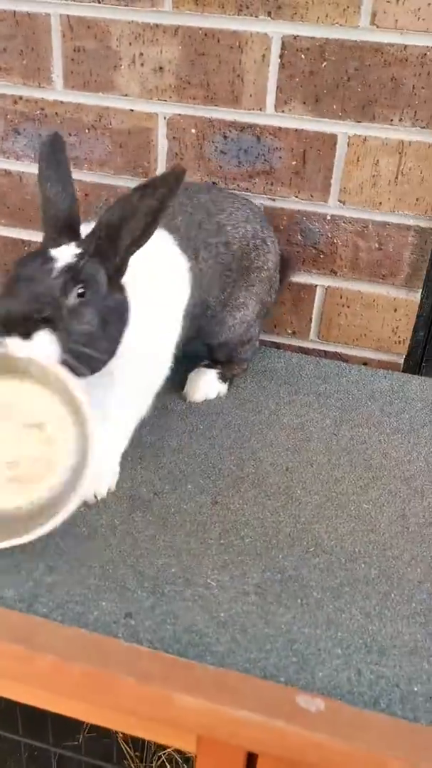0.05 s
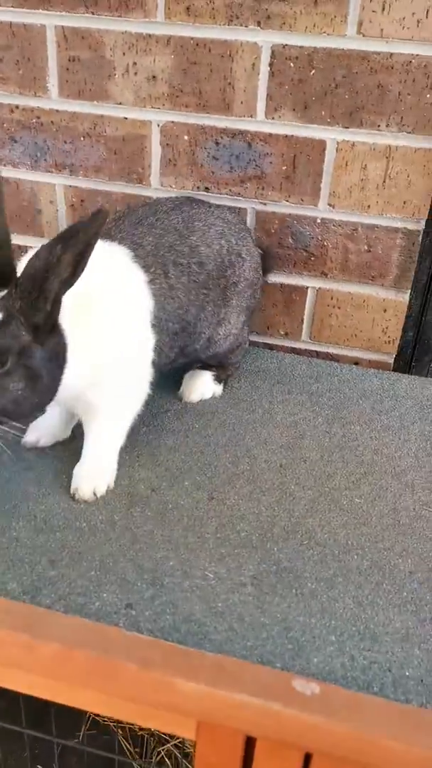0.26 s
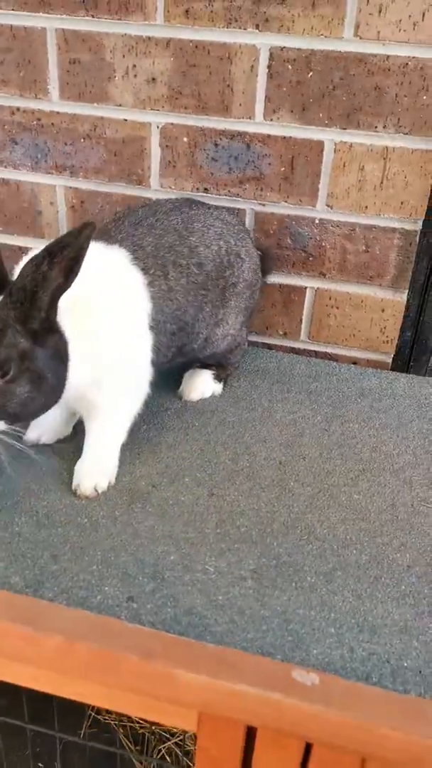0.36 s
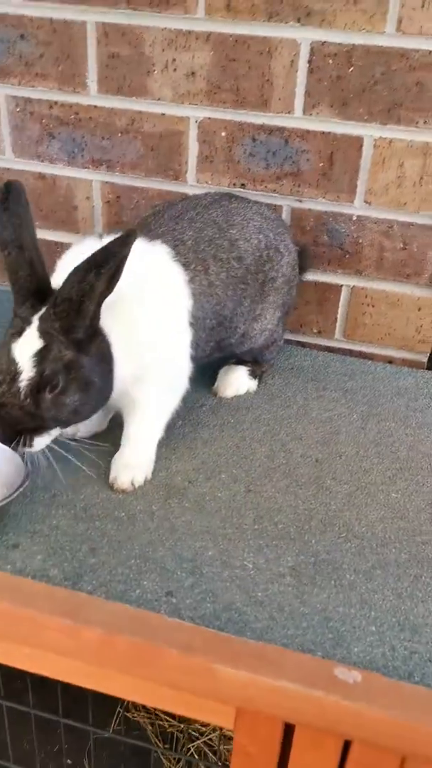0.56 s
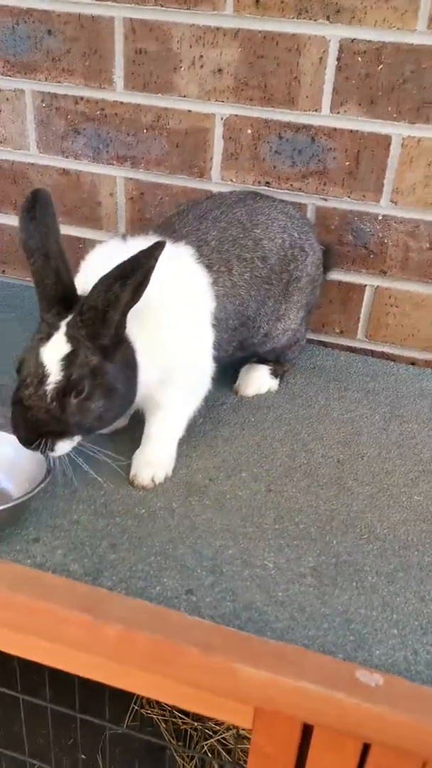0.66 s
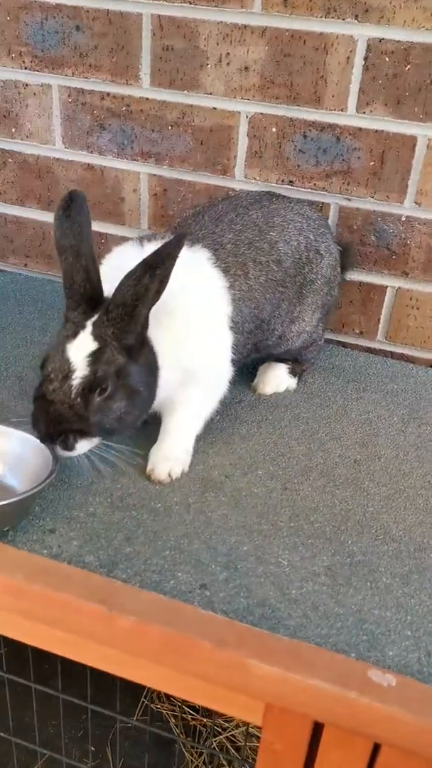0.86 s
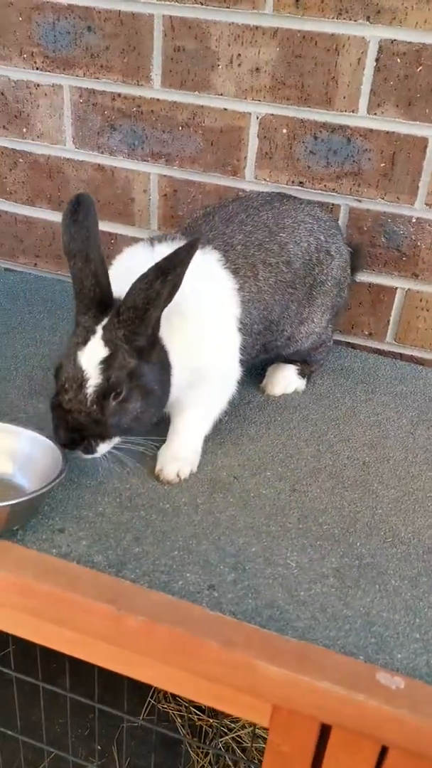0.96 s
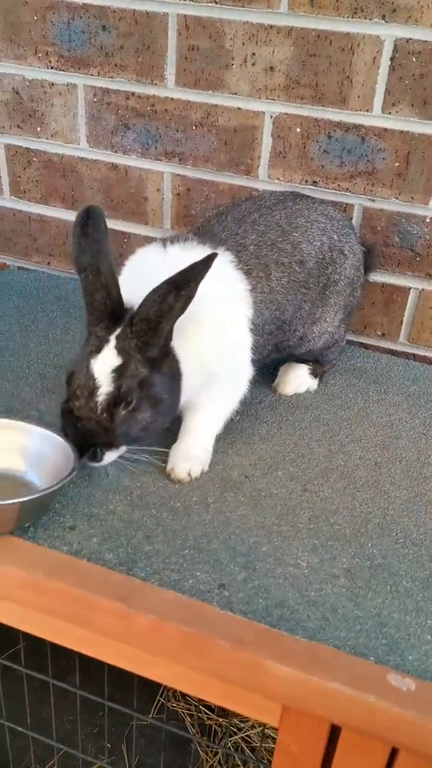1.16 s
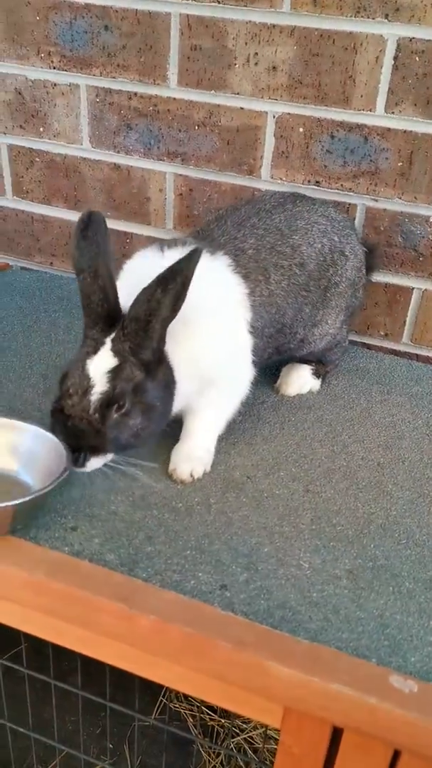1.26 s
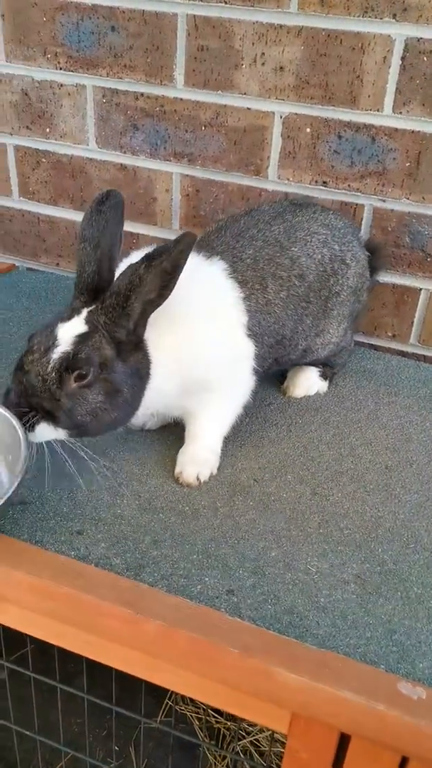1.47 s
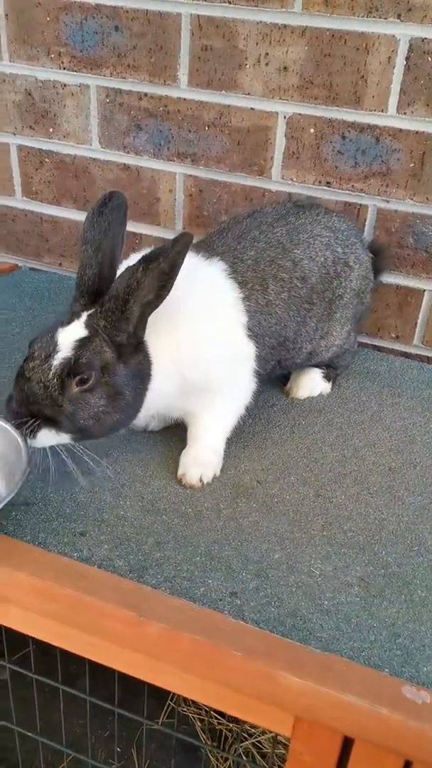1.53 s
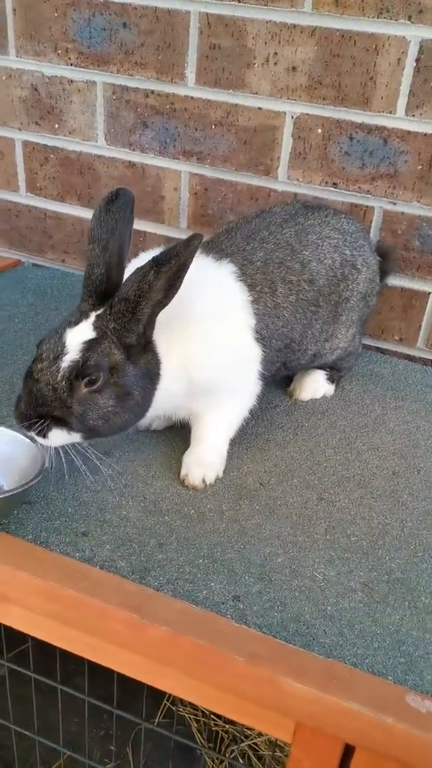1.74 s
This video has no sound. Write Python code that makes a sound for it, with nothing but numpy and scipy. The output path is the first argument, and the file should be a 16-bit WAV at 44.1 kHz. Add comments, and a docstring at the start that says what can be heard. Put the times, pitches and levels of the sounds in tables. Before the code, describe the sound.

A steel bowl lands with a bong, clangs, rolls and settles, then is nudged again.

```python
"""A faint scrape and soft thumps come first, then a loud bong: a rabbit has tossed its steel feeding
bowl onto the felted wooden top of its hutch, outdoors. The base flexes as it lands; the bowl tips onto
its rim with a clang, rolls and settles. Each contact excites the damped modes of the bowl's wall, and
the dragging rim makes single modes sing. Paws thump the lid and the felt is lightly scratched;
then the rabbit noses the bowl along and knocks it once more."""
import sys
import numpy as np
from scipy import signal
from scipy.fft import rfft, irfft
from scipy.io import wavfile
from scipy.ndimage import uniform_filter1d

SR = 44100
rng = np.random.default_rng(int(sys.argv[2]) if len(sys.argv) > 2 else 0)


def inscribe(sig):
    """Save sig as 16-bit PCM at rate SR to the path in sys.argv[1].

    A 1-D sig is mono; a 2-D sig holds one channel per row.
    Samples are clipped to [-1, 1] before scaling.
    """
    pcm = np.round(np.clip(np.atleast_2d(sig).T, -1, 1) * 32767)
    wavfile.write(sys.argv[1], SR, pcm.astype(np.int16))


N = 79380
HZ = np.fft.rfftfreq(4096, 1 / SR)
EDGE_HZ = 15100

# Coherence of the sound field. Each row: frequency in Hz, correlation of left and right.
COHERENCE = [(30, 0.92), (150, 0.97), (700, .98), (1400, 0.98), (2600, 0.66), (4500, 0.22), (8000, 0.097),
             (14000, -0.25)]
# Spectrum of the outdoor background. Each row: frequency in Hz, relative spectral density in dB.
AIR_SPECTRUM = [(25, -10), (90, -9.5), (160, -10), (260, -11), (600, -15.5), (950, -10), (1310, -19.5),
                (1950, -27), (2700, -28), (3700, -37), (5000, -41), (6300, -39), (7800, -41), (9500, -57),
                (15000, -69)]

# Dull response of bowl and lid together. Each row: frequency in Hz, gain in dB.
CLATTER_SPECTRUM = [(30, -17), (80, -15), (150, -4.5), (205, -12), (265, 3), (330, -3.5), (500, 2),
                    (680, -1.5), (950, 0), (1300, -5.5), (1600, -12.5), (2100, -16), (2550, -11),
                    (3200, -23.5), (4300, -24.5), (6000, -24), (7500, -17), (8100, -37.5), (8900, -34.5),
                    (9600, -53.5), (12500, -44.5), (15000, -52.5)]
# Direction of the clatter. Each row: frequency in Hz, left over right in dB.
CLATTER_BALANCE = [(100, -1), (600, -1), (1400, 2), (2600, 4.5), (5000, -2.5), (8000, 0), (13000, 5)]
# Bands that express contact hardness. The entries, in Hz: unchanged low band, bite, treble, fizz.
HARDNESS_HZ = [800, 2400, 6500, 12500]
# Rolling and sliding. Each row: start and length in seconds; change over the stroke, clatter level,
# bite, treble, fizz and ring gain at 1 kHz, all in dB; ring tilt in dB per octave.
SLIDES = [(0, 0.054, -9.5, -34, -7, 7, 10, -21, -0.5), (.352, 0.13, -2.5, -19, 3.5, 1, -2, 2, -2),
          (0.496, 0.065, -4.5, -18, 3.5, -4, 2, -19.5, 2),
          (0.573, 0.15, -10.5, -32.5, 3.5, 6, -10, -22.5, -8),
          (0.725, 0.058, -1.5, -30, -0.5, 7.5, 11, -16.5, -2.5),
          (0.803, 0.064, -10, -48.5, -1, 21, 0.5, -47, -5.5),
          (1.244, 0.041, 10.5, -57.5, 2, 23, 24, -37, 3), (1.294, 0.11, 0, -47, 5.5, 22, 24, -25.5, 0.5),
          (1.42, 0.07, 3.5, -30.5, -9, -8, -6, -12, -6.5),
          (1.478, 0.077, -5, -25.5, -40, -7, -5, -19.5, -1.5),
          (1.574, 0.021, -1.5, -24.5, -8, 2.5, 10, -7.5, -9),
          (1.608, 0.038, -4.5, -30, -13, -9, -5, -14, -5),
          (1.726, .08, -2.5, -24, -17, -13, -12, -10, -3.5)]
GRAINS_PER_S, GRAIN_SPREAD_DB, GRIT_SHARE = 2500, 3, 0.85
SLIDE_RISE_S, SLIDE_RELEASE_S, LID_T60_S = 0.0017, 0.019, 0.074

# Modes of the bowl's wall. Each row: frequency in Hz, level in dB, T60 in seconds, left over right in dB.
WALL_MODES = [(473.9, -38.5, 0.57, 1), (566.7, -36, 0.18, 1), (799, -37, 0.24, 1.5),
              (872.4, -44.5, 0.27, -0.5), (1135, -55.5, 0.72, 9), (1351, -46, 1.08, -11.5),
              (1380, -39, 0.53, 2.5), (1862, -47.5, 0.67, -8.5), (1922, -46.5, 0.6, 0),
              (2285, -58.5, 0.72, 3.5), (2480, -41.5, 0.23, 11.5), (2567, -45.5, 0.61, 5.5),
              (2614, -42, 0.27, 12), (2854, -55.5, 0.63, 14.5), (3283, -68, 0.59, 9.5), (3455, -47, .5, 14),
              (3656, -48, .35, 6), (3866, -57, .45, 5), (4000, -54, .45, 7), (4172, -60, .5, 3),
              (4400, -60.5, 0.15, 3), (4810, -46.5, 0.25, 9), (5620, -67, .35, 11), (6010, -53, .3, 6),
              (6040, -71.5, .35, -8.5), (7360, -75, .35, -14), (7400, -64.5, 0.23, 7),
              (7410, -54.5, 0.58, 19.5), (7060, -64, 0.21, -6.5), (8800, -65, 0.46, 1.5),
              (8300, -61, 0.45, -6), (9850, -72.5, 0.4, -2.5), (10500, -70, .3, 5), (12200, -67, .25, -3),
              (12880, -71.5, 0.21, 8), (13480, -79.5, 0.19, -6.5)]
# Leaning on the bowl sharpens its low modes. Each row: time in seconds, shift in Hz in the bass limit.
LEAN_SHIFT = [(1.2, -0.5), (1.42, 6.5), (1.5, 12.5), (1.66, 14.5), (1.72, 5)]
LEAN_REACH_HZ = 2340  # the shift fades for modes above about this
ROCK_DEPTH, ROCK_HZ = 0.63, 14  # each mode swells and dips as the bowl rocks
RING_WINDOW_S = 0.03  # sliding this long feeds the ring as much as one blow of the same level
# Modes caught by the dragged rim. Each row: start and swell time in seconds, frequency in Hz,
# peak level in dB, T60 in seconds, left over right in dB.
RIM_TONES = [(0, 0.0067, 3455, -61, 0.52, 12), (0, 0.1, 3656, -62, 0.25, 7.5),
             (0.253, 0.0043, 1380, -32, 1.45, -0.5), (.365, 0.041, 3455, -38, 0.34, 11.5),
             (0.417, 0.024, 1380, -33.5, 0.21, -3), (0.439, 0.052, 2567, -37, 0.44, 6),
             (.64, 0.039, 474.5, -40, 0.33, 0), (0.553, 0.048, 1344, -47.5, 0.86, -3),
             (0.727, 0.092, 3283, -61.5, 0.15, 9), (1.416, 0.016, 2567, -46, 0.23, 8),
             (1.44, 0.078, 811, -37, 0.75, 1), (1.577, 0.014, 2580, -50.5, 0.26, 8),
             (1.68, 0.018, 815.6, -41.5, 0.63, 0)]

# Paws on the lid. Each row: start in seconds, level in dB, frequency in Hz, T60 in seconds.
PAW_THUMPS = [(0, -45, 165.7, 0.63), (.07, -36, 83.6, 0.26), (0.271, -42.5, 87, 0.35),
              (0.351, -46.5, 87, .5), (0.431, -40.5, 83, 0.52), (0.521, -39, 164, 0.51),
              (0.743, -38, 260, .18), (0.846, -42, 162, 0.31), (0.992, -52.5, 165.6, 0.27),
              (1.116, -49, 165, 0.13), (1.487, -42.5, 149.3, 0.32), (1.583, -35.5, 155, 0.16),
              (1.69, -42.5, 144.2, 0.52), (1.757, -39, 147, 0.23)]
# Scratches on the felt. Each row: start in seconds, level in dB, centre in Hz, width in octaves,
# decay time in seconds.
FELT_SCRATCHES = [(0.075, -62.5, 6460, 0.2, 0.019), (0.116, -44, 6220, 0.31, 0.013),
                  (0.117, -48, 2000, 0.98, 0.014), (1.063, -56.5, 5120, .14, 0.007),
                  (1.189, -66.5, 7400, 0.084, 0.034)]

# Impacts of the bowl. Each row: start in seconds; clatter level, bite, treble and fizz in dB;
# crack length in seconds, tail level in dB, tail T60 in seconds, ring gain at 1 kHz in dB,
# ring tilt in dB per octave.
BLOWS = [(0.2476, -4, 3.5, 6.5, -20, .0025, -20, 0.54, 4, -5),
         (0.3414, -5, 5, 0.5, 13, 0.0045, -9.5, 0.24, -1, 2.5),
         (.4045, -12.5, -10.5, -4, -12, 0.0077, -21, .1, -12.5, 3),
         (0.4392, -12, 4.5, -9, -13, .004, -21, 0.09, -6.5, -8),
         (0.717, -38.5, -3, 18.5, -8, 0.0028, -1, 0.11, -22, 3.5),
         (1.419, -33, 4, -1, -2, .004, -6, 0.6, -11.5, -2),
         (1.6738, -12, 8, -2, 4, 0.0025, -4, 0.25, -2.5, -1.5)]
# Harmonics of the flexing base. Each row: harmonic number, level in dB, fall until the choke in dB,
# left over right in dB.
BASE_HARMONICS = [(1, -11.5, 27.5, 2), (2, -16.5, 12.5, -2.5), (3, -41.5, 7, -1), (4, -48.5, 7.5, -2.5)]
BASE_START_S, BASE_LENGTH_S, BASE_RISE_S, BASE_CHOKE_S = 0.2482, 0.095, 0.0014, 0.0035
BASE_HZ, BASE_SAG, BASE_SAG_S, BASE_FALL_POWER = 572.7, 0.17, 0.004, 3.2


def amp(db):
    return 10 ** (np.asarray(db) / 20)


def unit_rms(x):
    return x / np.sqrt(np.mean(x ** 2) + 1e-20)


def curve(points, hz=HZ):
    """Interpolation on a logarithmic frequency axis."""
    f, value = np.transpose(points)
    return np.interp(np.log(hz + 1), np.log(f + 1), value)


def add(mix, start_s, sound):
    part = mix[:, max(round(start_s * SR), 0):][:, :sound.shape[-1]]
    part += sound[..., :part.shape[1]]


def played(source, table):
    """Superposition of a table's events, each at its start time."""
    mix = np.zeros((2, N))
    for start_s, *row in table:
        add(mix, start_s, source(*row))
    return mix


def clock(seconds):
    return np.arange(int(seconds * SR)) / SR


def split(difference):
    """A level or phase difference, shared equally between left and right."""
    return np.array([[.5], [-.5]]) * difference


def colour(x, db):
    """Minimum-phase filtering: the folded cepstrum gives a causal response with these gains."""
    cepstrum = irfft(np.log(amp(np.maximum(db, -120))))
    half = len(HZ) - 1
    cepstrum[..., 1:half] *= 2
    cepstrum[..., half + 1:] = 0
    taps = np.atleast_2d(irfft(np.exp(rfft(cepstrum)))[..., :half])
    return signal.fftconvolve(x, taps, axes=1)[:, :x.shape[1]]


def noise(size):
    """Partially coherent white noise: left and right are alike in the bass, unlike in the treble."""
    a, b = rfft(rng.standard_normal((2, N)))
    coherence = curve(COHERENCE, np.fft.rfftfreq(N, 1 / SR))
    mid, side = a * np.sqrt((1 + coherence) / 2), b * np.sqrt((1 - coherence) / 2)
    return irfft(np.array([mid + side, mid - side]), N)[:, :size]


def heard(wave, hz, side_db):
    """Level and phase differences place a mode in space; high modes arrive out of step."""
    skew = np.arccos(curve(COHERENCE, hz))
    return (amp(split(side_db)) * np.exp(1j * split(skew)) * wave).imag


def outdoor_air(db=-56):
    """Stationary noise, strongest at low frequencies."""
    return amp(db) * unit_rms(colour(noise(N), curve(AIR_SPECTRUM)))


def stroke(t, length, change_db):
    """Force envelope of a slide: a quick rise, a steady change in dB, an exponential release."""
    rise = np.clip(t / SLIDE_RISE_S, 0, 1)
    release = np.exp(-np.maximum(t - length, 0) / SLIDE_RELEASE_S)
    return rise * amp(change_db * np.clip(t / length, 0, 1)) * release


def clatter(force, bite_db, treble_db, fizz_db):
    """Source and filter: bowl and lid colour the force, and harder contacts carry more treble."""
    hardness = curve(list(zip(HARDNESS_HZ, [0, bite_db, treble_db, fizz_db])))
    return colour(force, curve(CLATTER_SPECTRUM) + hardness + split(curve(CLATTER_BALANCE)))


def slide(length, change_db, db, bite_db, treble_db, fizz_db, *ringing):
    """Friction noise: gritty felt under the rim gives tiny taps that shake the lid, and smooth rubbing."""
    t = clock(1)
    force = stroke(t, length, change_db)
    taps = (rng.random(SR) < GRAINS_PER_S / SR) * rng.choice([-1, 1], SR)
    grit = unit_rms(taps * amp(GRAIN_SPREAD_DB * np.minimum(rng.exponential(1, SR), 4)))
    lid_response = noise(SR) * amp(-60 * t / LID_T60_S)
    lid_response /= np.sqrt(np.sum(lid_response ** 2) / 2)
    shaken = signal.fftconvolve((grit * force)[None], lid_response, axes=1)[:, :SR]
    rubbed = noise(SR) * force
    friction = np.sqrt(GRIT_SHARE) * shaken + np.sqrt(1 - GRIT_SHARE) * rubbed
    return amp(db) * clatter(friction, bite_db, treble_db, fizz_db)


def steel_resonances(contacts, count=75, width_hz=53, lowest_hz=2000, onset_hz=2440, gap_db=-9):
    """Resonant filtering: the treble of each contact passes through the thin steel's many narrow peaks."""
    centres = lowest_hz + (np.arange(count) + rng.random(count)) / count * (EDGE_HZ - lowest_hz)
    detuning = 2 * (HZ[:, None] - centres) / width_hz
    peaks = (1 / (1 + detuning ** 2)).sum(1) + amp(gap_db) ** 2
    peaks /= peaks[(HZ > centres[0]) & (HZ < EDGE_HZ)].mean()
    share = np.clip(HZ / onset_hz - 1, 0, 1)
    return colour(contacts, 10 * np.log10(1 - share + share * peaks))


def wall_ring():
    """Energy balance: blows and slides feed every mode of the wall, and each decays at its own rate."""
    t = np.arange(N) / SR
    impulses = [1. * (np.arange(N) == round(start * SR)) for start, *_ in BLOWS]
    drags = [stroke(t - start, length, change_db) ** 2 / (SR * RING_WINDOW_S)
             for start, length, change_db, *_ in SLIDES]
    feeds = np.array(impulses + drags)
    ring_db, tilt_db = np.transpose([row[-2:] for row in BLOWS + SLIDES])
    lean_hz = np.interp(t, *np.transpose(LEAN_SHIFT))
    ring = np.zeros((2, N))
    for hz, db, t60, side_db in WALL_MODES:
        fed = amp(db + ring_db + tilt_db * np.log2(hz / 1000)) ** 2 @ feeds
        retained = np.exp(-2 * np.log(1000) / (t60 * SR))
        energy = signal.lfilter([1], [1, -retained], fed)
        envelope = uniform_filter1d(np.sqrt(energy / (1 + ROCK_DEPTH ** 2)), size=70)
        knots = rng.standard_normal((2, 200))
        rocking = 1 + ROCK_DEPTH * np.interp(t * ROCK_HZ, np.arange(200), knots[0] + 1j * knots[1])
        cycles = np.cumsum(hz + lean_hz * np.exp(-(hz / LEAN_REACH_HZ) ** 2)) / SR
        ring += heard(envelope * rocking * np.exp(2j * np.pi * cycles), hz, side_db)
    return ring


def rim_tone(length, hz, db, t60, side_db):
    """Frictional excitation: one mode gains energy while the rim drags, then decays freely."""
    t = clock(1)
    swell = np.minimum(t / length, 1) ** .5 * amp(db - 60 * np.maximum(t - length, 0) / t60)
    return heard(swell * np.exp(2j * np.pi * (hz * t + rng.random())), hz, side_db)


def paw_thump(db, hz, t60, rise_s=0.0049, rumble_gain=0.51):
    """Damped vibration: a soft push on the wooden lid leaves a low tone and a rumble around it."""
    t = clock(0.57)
    rumble = unit_rms(colour(noise(len(t)), -12 * abs(np.log2((HZ + 1) / hz))))
    envelope = amp(db - 60 * t / t60) * np.minimum(t / rise_s, 1)
    return envelope * (np.sin(2 * np.pi * hz * t) + rumble_gain * rumble)


def felt_scratch(db, hz, octaves, decay_s, rise_s=0.0038):
    """Friction on the felt gives a brief rasp of band-limited noise."""
    t = clock(.5)
    band_db = -20 * np.log10(1 + (np.log2((HZ + 1) / hz) / octaves) ** 4 / 2)
    rasp = unit_rms(colour(noise(len(t)), band_db))
    envelope = np.minimum(t / rise_s, 1) * np.exp(-np.maximum(t - rise_s, 0) / decay_s)
    return amp(db) * rasp * envelope


def blow(db, bite_db, treble_db, fizz_db, crack_s, tail_db, tail_t60, *ringing):
    """Impact excitation: a brief contact gives a broadband crack and a clattering tail."""
    t = clock(1)
    crack = np.exp(-(t / crack_s) ** 2 / 2)
    tail = amp(tail_db - 60 * t / tail_t60)
    return amp(db) * clatter(noise(SR) * (crack + tail), bite_db, treble_db, fizz_db)


def base_bong():
    """Flexural vibration: the base swings hard, low in pitch at first, and is choked as the bowl tips."""
    t = clock(2 * BASE_LENGTH_S)
    cycles = np.cumsum(BASE_HZ * (1 - BASE_SAG * np.exp(-t / BASE_SAG_S))) / SR
    gate = np.minimum(t / BASE_RISE_S, 1) * np.exp(-np.maximum(t - BASE_LENGTH_S, 0) / BASE_CHOKE_S)
    tipped = np.minimum(t / BASE_LENGTH_S, 1) ** BASE_FALL_POWER
    return gate * sum(amp(db - fall_db * tipped + split(side_db)) * np.cos(2 * np.pi * k * cycles)
                      for k, db, fall_db, side_db in BASE_HARMONICS)


def scene():
    """Linear superposition of still outdoor air, bowl and paws."""
    mix = outdoor_air() + wall_ring() + played(rim_tone, RIM_TONES)
    add(mix, BASE_START_S, base_bong())
    mix += steel_resonances(played(blow, BLOWS) + played(slide, SLIDES))
    return mix + played(paw_thump, PAW_THUMPS) + played(felt_scratch, FELT_SCRATCHES)


def record(dry):
    """Band limiting: a linear-phase low-pass removes the highest treble."""
    taps = signal.firwin(511, EDGE_HZ, window=("kaiser", 9), fs=SR)
    return signal.oaconvolve(dry, taps[None], "same")


dry = scene()
out = record(dry)
inscribe(out)
```